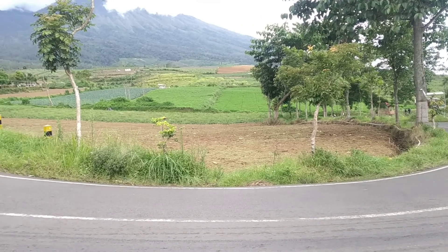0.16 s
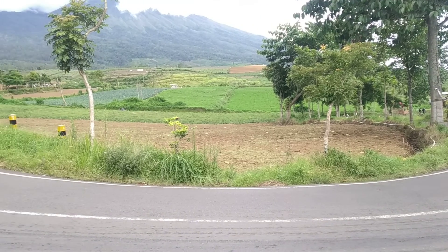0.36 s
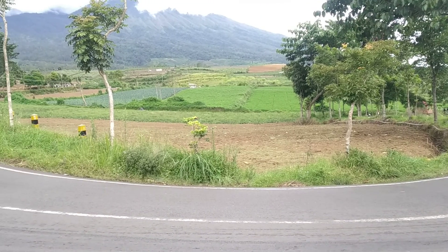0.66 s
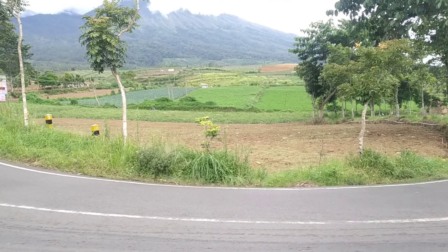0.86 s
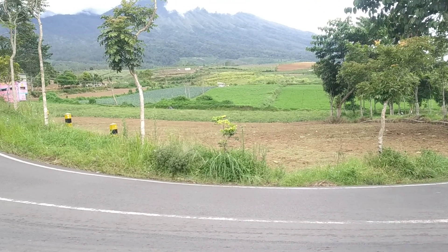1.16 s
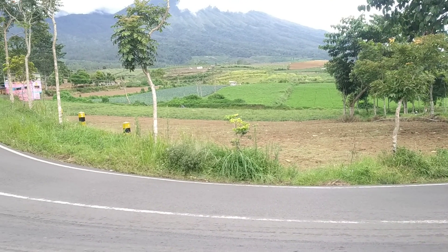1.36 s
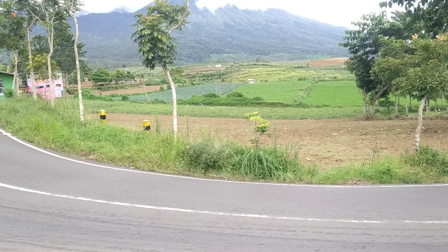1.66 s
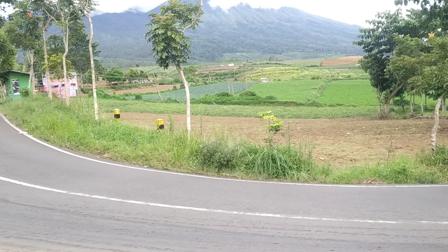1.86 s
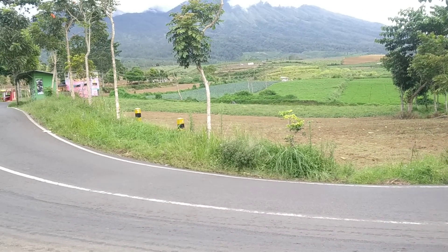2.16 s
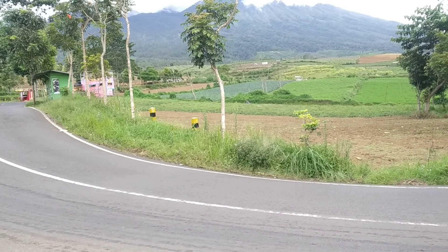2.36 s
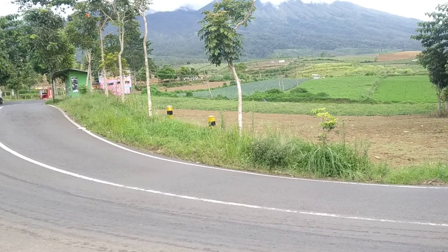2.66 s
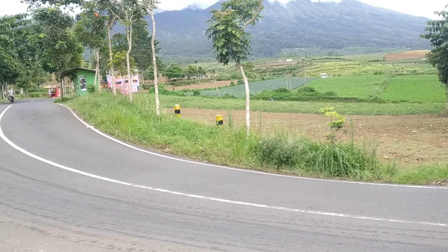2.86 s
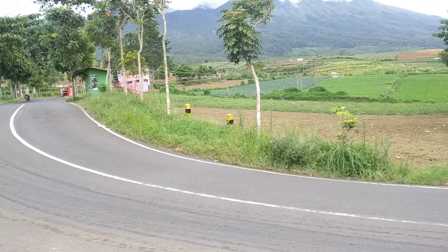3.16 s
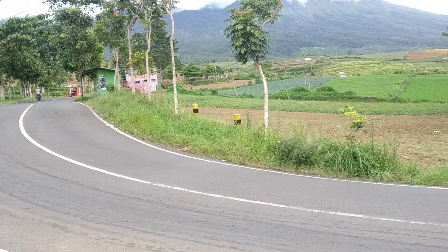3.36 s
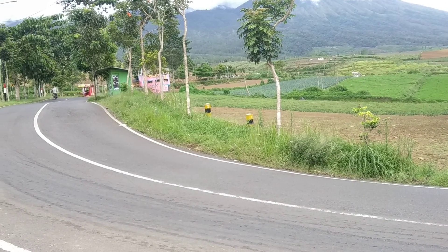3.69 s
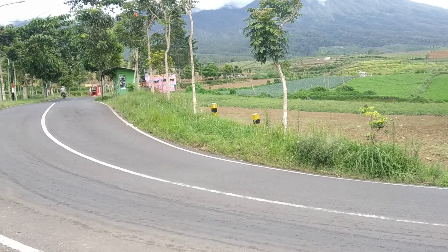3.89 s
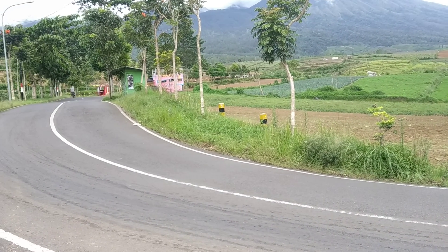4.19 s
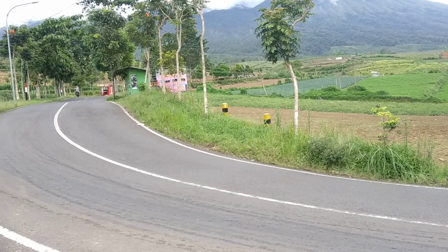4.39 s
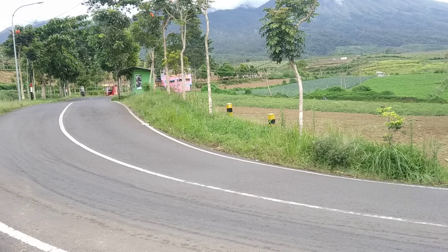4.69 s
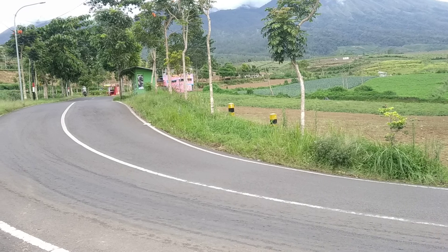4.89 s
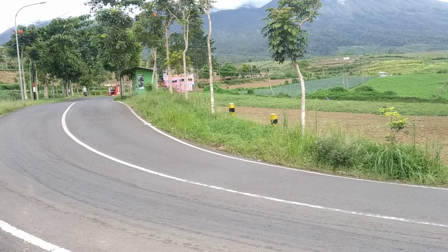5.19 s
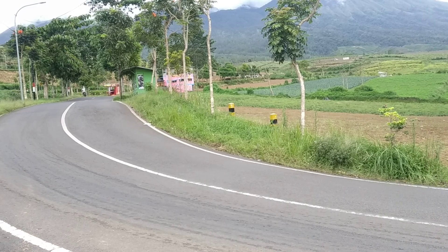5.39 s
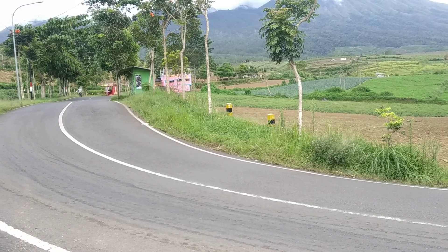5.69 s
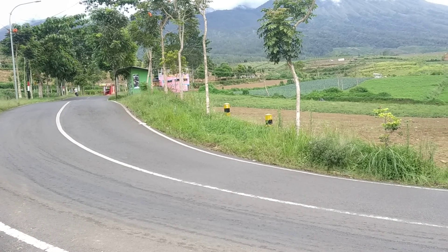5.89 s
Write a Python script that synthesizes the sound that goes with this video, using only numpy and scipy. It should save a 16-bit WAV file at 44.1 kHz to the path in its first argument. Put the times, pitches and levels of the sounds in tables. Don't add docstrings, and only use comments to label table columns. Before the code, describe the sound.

A small one-cylinder motorcycle rasps loudly close by, then pulls away along a country road and fades, with wind buffeting and faint birdsong.

```python
import sys
import numpy as np
from scipy import signal
from scipy.io import wavfile
from scipy.ndimage import uniform_filter1d

SR = 44100
rng = np.random.default_rng(int(sys.argv[2]) if len(sys.argv) > 2 else 0)


def wrap_up_sound(samples):
    columns = np.atleast_2d(samples).T
    tamed = np.clip(columns, -1, 1)
    steps = np.round(tamed * 32767).astype(np.int16)
    wavfile.write(sys.argv[1], SR, steps)


def ratio(d):
    e = np.asarray(d, float) / 20
    return 10 ** e


N = 266364


def unit_rms(x):
    return x / np.sqrt(np.mean(x ** 2) + 1e-20)


def in_time(rows):
    start_s, *columns = np.transpose(rows)
    return [np.interp(np.arange(N) / SR, start_s, column) for column in columns]


def at_hz(points, hz):
    points_hz, values = np.transpose(points)
    return np.interp(np.log(hz), np.log(points_hz), values)


def drift(rate_hz):
    r = np.exp(-80 * np.pi * rate_hz / SR)
    draws = rng.standard_normal(N // 40 + 2002)
    slow = signal.lfilter([1], [1, -2 * r, r * r], draws)[2000:]
    return np.interp(np.arange(N) / 40, np.arange(len(slow)), unit_rms(slow))


def fade(x, seconds):
    return signal.lfilter([1], [1, -np.exp(-1 / (seconds * SR))], x + 1e-18)


def delayed(x, delay_ms):
    return np.interp(np.arange(N) - delay_ms * SR / 1000, np.arange(N), x)


def noise_bands(low_hz, top_hz, channels, per_octave=3):
    count = np.arange(per_octave * np.log2(top_hz / low_hz) + 1)
    edges = low_hz * 2 ** (count / per_octave)
    white = rng.standard_normal((2, channels, N))
    for k, (low, high) in enumerate(zip(edges, edges[1:])):
        sos = signal.butter(2, [low, min(high, SR * .45)], "band", fs=SR, output="sos")
        yield np.sqrt(low * high), signal.sosfilt(sos, white[k % 2])


def ports(left, right, lag_ms, pan_db):
    return np.array([delayed(left, lag_ms) * ratio(pan_db / 2), right * ratio(-pan_db / 2)])


# pitch_hz, density_db [dB per Hz]
BUFFET_COLOUR = [(12, 5), (25, -1.5), (60, -1.5), (120, -3.5), (200, -10), (320, -15), (500, -32),
                 (900, -35)]
# start_s (the peak), length_s, level_db, left_over_right_db
GUSTS = [(0, 0.024, -16.5, -12), (0.153, .12, -31, -12), (0.467, 0.097, -29.5, 7), (0.836, 0.047, -32, -9),
         (1.053, .06, -37, -8), (1.284, .1, -31, 2), (1.8, 0.17, -34.5, 7), (2.13, 0.089, -30, -1),
         (2.437, 0.092, -34.5, 4), (2.717, 0.071, -44, -6), (3.003, 0.074, -33, -3), (3.34, 0.07, -37, 4),
         (3.62, .07, -40, -11), (4.18, 0.092, -53, 3), (5.077, 0.048, -50, -9), (5.53, 0.072, -43, -9),
         (5.698, 0.06, -44, -15), (5.923, 0.16, -35, 10)]
BREEZE_DB, BREEZE_DROP_DB_PER_S = -31, 4


def wind():
    t = np.arange(N) / SR
    sides = np.array([[1], [-1]])
    power = np.ones((2, 1)) * ratio(2 * (BREEZE_DB - BREEZE_DROP_DB_PER_S * t))
    for start_s, length_s, level_db, pan_db in GUSTS:
        power = power + ratio(2 * level_db + sides * pan_db) * np.exp(-((t - start_s) / length_s) ** 2)
    out = 0
    for hz, noise in noise_bands(11.09, 900, channels=2):
        lumps_db = 1.3 * np.array([drift(9.3), drift(39)])
        out = out + ratio(at_hz(BUFFET_COLOUR, hz) + lumps_db) * noise
    return unit_rms(out) * ratio(4.5) * np.sqrt(power)


def field(level_db=-50, dull_hz=6000):
    hiss = signal.lfilter([1], [1, -.8], rng.standard_normal((2, N)))
    dull = signal.sosfilt(signal.butter(3, dull_hz, fs=SR, output="sos"), hiss)
    return ratio(level_db) * unit_rms(dull)


# start_s, speed_rpm
SPEED = [(0, 3624.0), (1, 3806.9), (2, 3996.8), (3, 4215.0), (3.4, 4246.1), (4.2, 4268.6), (5, 4305.2),
         (6.04, 4437.5)]
FIRST_FIRING = .2784


def firings():
    rpm, = in_time(SPEED)
    cycles = np.cumsum(rpm) / (120 * SR) - FIRST_FIRING
    stroke = np.arange(np.ceil(cycles[-1]))
    wheel_s = .00015 * np.sin(2 * np.pi * stroke / 6.5)
    waver_s = wheel_s + .00004 * rng.standard_normal(len(stroke))
    return np.round(np.interp(stroke, cycles, np.arange(N)) + waver_s * SR).astype(int)


STRENGTH_TIMES = [.6, 2.1, 3.4, 5.0]


def rung(modes, at, force_db, spread_db):
    out = np.zeros(N)
    for hz, t60_s, *strengths in modes:
        clicks = np.zeros(N)
        hit_db = force_db + spread_db * rng.standard_normal(len(at))
        clicks[at] = np.interp(at / SR, STRENGTH_TIMES, strengths) * ratio(hit_db)
        r, w = ratio(-60 / (t60_s * SR)), 2 * np.pi * hz / SR
        out += signal.lfilter([0, np.sin(w)], [1, -2 * r * np.cos(w), r * r], fade(clicks, .00025))
    return out


# pitch_hz, t60_s (time to fall 60 dB), then four signed strengths [ratio]
PIPE = [(100.8, 0.083, -2, -0.24, -1.8, 0.52), (181.3, 0.068, 2.37, 0.84, 3.36, -0.1),
        (215.9, 0.091, 2, 3, 2.5, 1.05), (234.8, 0.1, -0.4, 0.42, 1.9, 2),
        (304.9, 0.078, 1.13, 1.05, 2.03, -0.36), (318.7, 0.11, 0.87, 0.5, 0.69, 0.77),
        (378, 0.068, -0.09, -1, -0.74, 0.16), (515, 0.059, -0.08, -0.58, 0.2, 0)]
SILENCER = [(602, 0.047, -0.02, -0.074, -0.43, -0.17), (740, 0.092, -0.13, -0.011, 0.014, -0.06),
            (825.5, 0.034, -0.14, -0.27, -0.73, -0.51), (910, 0.022, 0.22, 1, 0.9, 0.77),
            (995, 0.029, 0.58, 0.38, 0.95, 0.3)]
# start_s, delay_ms, share [ratio]
BANK = [(0, 3.9, 0.18), (1.2, 4.5, 0.065), (2.2, 4.9, 0.18), (2.42, 4.8, 0.021), (2.65, 7.13, 0.34),
        (3.3, 5.07, 0.24), (4.0, 4.93, 0.43), (4.7, 5.36, 0.24), (6.04, 3.16, 0.045)]


def thump(at):
    force_db = .5 * rng.standard_normal(len(at))
    low = rung(PIPE, at + round(.00125 * SR), force_db, .5)
    low = signal.lfilter(*signal.butter(2, 50, "high", fs=SR), low)
    delay_ms, share = in_time(BANK)
    low = low + share * delayed(low, delay_ms)
    high = rung(SILENCER, at + round(.001802 * SR), force_db + 4.5, .88)
    even = np.sqrt(uniform_filter1d((low + high) ** 2, size=SR // 4, mode="mirror"))
    return low / even, high / even


# pitch_hz, density_db [dB per Hz]
RASP_COLOUR = [(710, -44), (1200, -2), (1280, 27), (1410, -9), (1640, -3), (2200, 4), (3050, -4.5),
               (4500, 1.5), (5130, -6), (7020, 3.5), (9310, -2.5), (10100, 6), (12100, -8.5), (15000, -6),
               (16000, -32)]
# pitch_hz, density_db [dB per Hz]
CLATTER_COLOUR = [(300, 16), (500, 4.5), (900, 10.5), (1400, 3), (2300, 5.5), (4000, -2.5), (5500, -0.5),
                  (7500, 4), (11000, -1), (13000, -34), (16000, -16)]
# pitch_hz, share of the level change [ratio]
LOSS_SHARE = [(1000, 0.86), (2200, 0.82), (4000, .75), (7000, 1.164), (12000, 1.33)]
# pitch_hz, share of the lag [ratio]
BENDING = [(300, 0.19), (1000, 0.52), (1800, 0.67), (3000, 0.87), (6000, 0.906), (15000, 0.93)]
# pitch_hz, share of the rasp's left-right dB [ratio]
SHADOW = [(1000, 5), (2400, -2), (4400, -1.7), (8000, 8), (15000, 6)]
SPIT_DELAY_MS, OPENING_MS, SPIT_MS = 1.38, .14, 1.52
AFTERBLOW_MS, AFTERBLOW_SHARE = 5.8, .24
STROKE_DB, COLOUR_DB = 1.7, 2.8
CLATTER_DB, CLATTER_FOLLOWS = -7.5, .38
SWAY_DB, SWAY_PER_S = 1.0, 4.0
ALIKE_AT_2K, ALIKE_LOSS_PER_OCTAVE = .9, .02
SHIMMER_CYCLES, SHIMMER_PER_S = .15, 6


def rasp(at, rasp_db, lag_ms, pan_db):
    force_db = STROKE_DB * rng.standard_normal(len(at))
    lag_ms = lag_ms + .014 * drift(20)
    out = 0
    for hz, (shared, left, right) in noise_bands(277.4, 16500, channels=3, per_octave=5):
        clicks = np.zeros(N)
        stroke_db = force_db + COLOUR_DB * rng.standard_normal(len(at))
        clicks[at + round(SPIT_DELAY_MS * SR / 1000)] = ratio(stroke_db)
        opening = clicks
        for _ in range(3):
            opening = fade(opening, OPENING_MS / 1000)
        spit_s = SPIT_MS / 1000 * (7000 / hz) ** .72
        spit = fade(opening, spit_s) + AFTERBLOW_SHARE * fade(opening, AFTERBLOW_MS / 1000)
        bass_cut_db = 9.8 * max(0, np.log2(1300 / hz))
        spit = ratio(at_hz(RASP_COLOUR, hz) - bass_cut_db) * unit_rms(spit)

        clatter_db = CLATTER_DB + 2.5 - (1 - CLATTER_FOLLOWS) * rasp_db
        clatter = ratio(at_hz(CLATTER_COLOUR, hz) + clatter_db + drift(42))
        band_db = at_hz(LOSS_SHARE, hz) * rasp_db + SWAY_DB * drift(SWAY_PER_S) - 37
        level = ratio(band_db) * (spit + clatter)

        alike = np.clip(ALIKE_AT_2K - ALIKE_LOSS_PER_OCTAVE * np.log2(hz / 2000), 0, 1)
        pair = level * (np.sqrt(alike) * shared + np.sqrt(1 - alike) * np.array([left, right]))
        shimmer_ms = SHIMMER_CYCLES * 1000 / max(hz, 2000) * drift(SHIMMER_PER_S)
        out = out + ports(*pair, at_hz(BENDING, hz) * lag_ms + shimmer_ms, at_hz(SHADOW, hz) * pan_db)
    return out


def slap(peak_s=.836, length_ms=9.1, level_db=-31, top_hz=695, pan_db=-14):
    sos = signal.butter(2, [150, top_hz], "band", fs=SR, output="sos")
    noise = signal.sosfilt(sos, rng.standard_normal((2, N)))
    puff = np.exp(-((np.arange(N) / SR - peak_s) * 1000 / length_ms) ** 2)
    return ratio(level_db + np.array([[.5], [-.5]]) * pan_db) * puff * unit_rms(noise)


def whistle(rows):
    s, hz, level_db = np.transpose(rows)
    t = np.arange(N) / SR
    ends = np.clip(np.minimum(t - s[0], s[-1] - t) / .0025, 0, 1)
    phase = 2 * np.pi * np.cumsum(np.interp(t, s, hz)) / SR
    return ends * ratio(np.interp(t, s, level_db)) * np.sin(phase)


# start_s, pitch_hz, level_db
PEEPS = [
    (2.41, 2300, -46),
    (2.652, 2320, -44),
]
# start_s, level_db, first_two_notes_db (re the rest)
PHRASES = [
    (3.672, 4.5, -5),
    (5.698, -1, -1.5),
]
# start_s (into the phrase), pitch_hz, level_db
SONG = [
    [(0, 3160, -48), (.024, 3960, -49), (.052, 3350, -53)],
    [(.13, 3610, -46), (.143, 3030, -42.5), (.158, 2740, -55)],
    [(.205, 2514, -52), (.229, 2785, -42.5), (.262, 2120, -49)],
    [(.284, 2080, -50), (.302, 2470, -51), (.33, 2060, -53)],
]


def birds():
    dry = np.zeros(N)
    for start_s, hz, level_db in PEEPS:
        dry += whistle([(start_s, hz, level_db), (start_s + .021, hz, level_db)])
    for start_s, phrase_db, opening_db in PHRASES:
        for k, note in enumerate(SONG):
            note_db = phrase_db + opening_db * (k < 2)
            dry += whistle(np.add(note, [start_s, 0, note_db]))
    dry = dry * ratio(drift(60))
    echoes = rng.standard_normal((2, 3000)) * np.exp(-np.arange(3000) / (.018 * SR)) * ratio(-24)
    return dry + signal.fftconvolve(dry[None], echoes, axes=1)[:, :N]


# start_s, thump_db, rasp_db (falls with distance and angle)
RIDE = [(0, -21.5, 14.5), (.4, -20.5, 10), (.8, -21.5, 10.5), (1.2, -21.5, 5.5), (1.7, -23, 1.5),
        (2.2, -25, 2), (2.6, -25.5, -1.5), (3.0, -25, -2.5), (3.4, -25, -0.5), (3.75, -24.5, -2),
        (3.9, -25, -6.5), (4.3, -25.5, -6.5), (4.7, -26.5, -5.5), (5.1, -27, -13.5), (5.6, -29, -13),
        (6.04, -30.5, -13.5)]
# start_s, left_port_lag_ms, thump_left_over_right_db, rasp_left_over_right_db
BEARING = [(0, 0.57, -3.5, 1), (1, 0.53, -1.5, 1), (2, 0.45, -1, 1), (3, 0.42, -1.5, 0.5),
           (4, 0.317, -1.5, 0.5), (6.04, 0.36, -1.5, 0.5)]
# start_s, level_db
FACING = [(0, 0.5), (.8, 0.5), (1.4, 0.5), (2.3, 0), (3.2, 1.5), (3.6, 1), (4.15, 2.5), (4.8, -2),
          (6.04, 1)]


def scene():
    thump_db, rasp_db = in_time(RIDE)
    lag_ms, thump_pan_db, rasp_pan_db = in_time(BEARING)
    facing_db, = in_time(FACING)
    at = firings()
    low, high = ratio(thump_db) * np.array(thump(at))
    high = high * ratio(facing_db)
    pipe = ports(low, low, .22 * lag_ms, thump_pan_db)
    silencer = ports(high, high, .38 * lag_ms, thump_pan_db + 1.5)
    engine = pipe + silencer + rasp(at, rasp_db, lag_ms, rasp_pan_db)
    return wind() + field() + engine + slap() + birds()


def roll_off(x):
    return signal.sosfilt(signal.butter(12, 16650, fs=SR, output="sos"), x)


def record(dry):
    rounded = 1.1 * np.tanh(dry / 1.1)
    top_cut = signal.cheby2(12, 70, 16700, fs=SR, output="sos")
    return roll_off(signal.sosfilt(top_cut, rounded))


dry = scene()
out = record(dry)
wrap_up_sound(out)
```